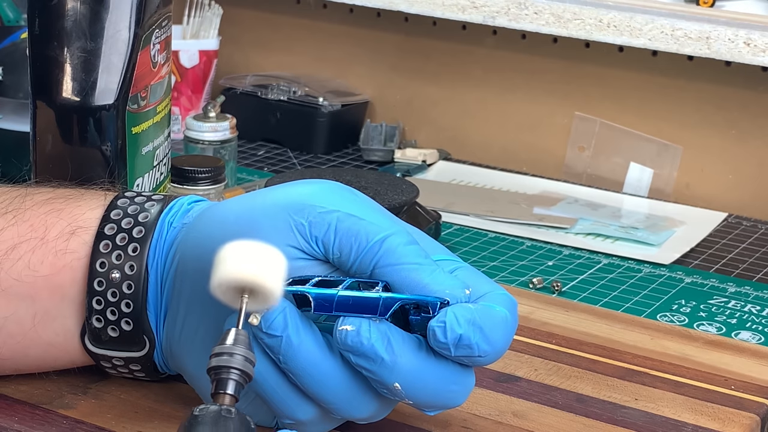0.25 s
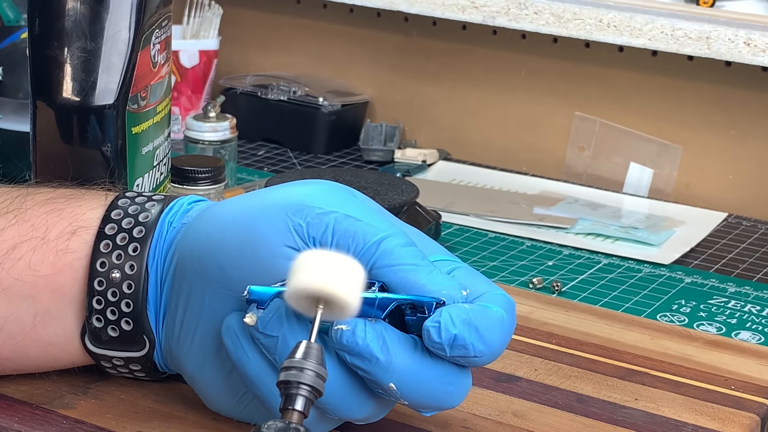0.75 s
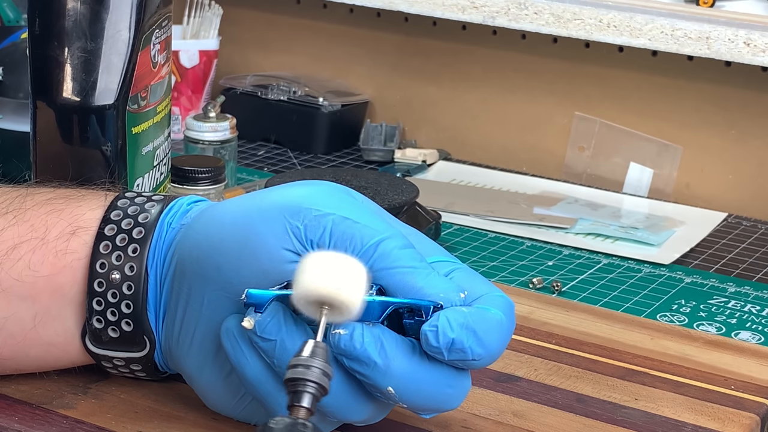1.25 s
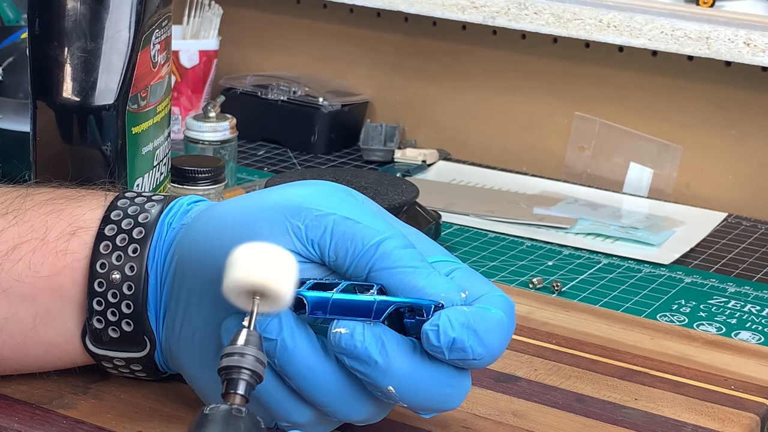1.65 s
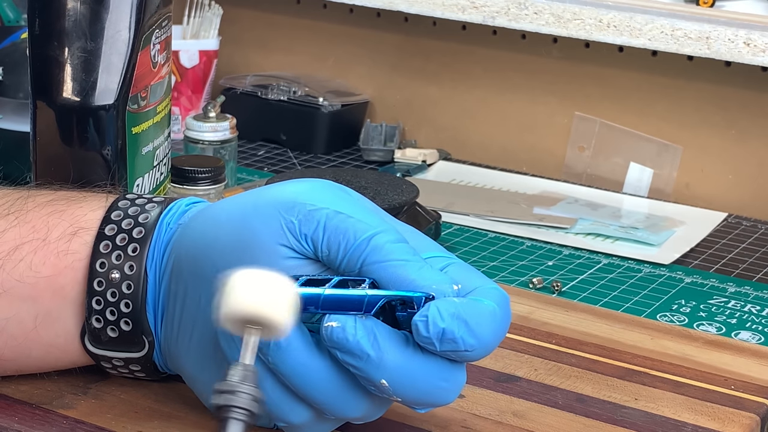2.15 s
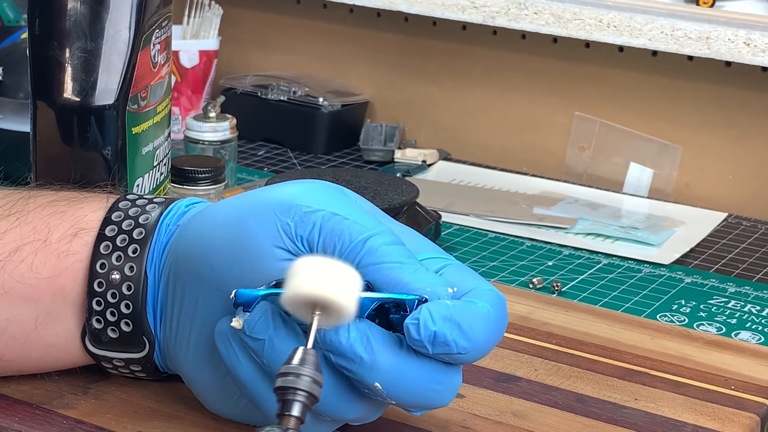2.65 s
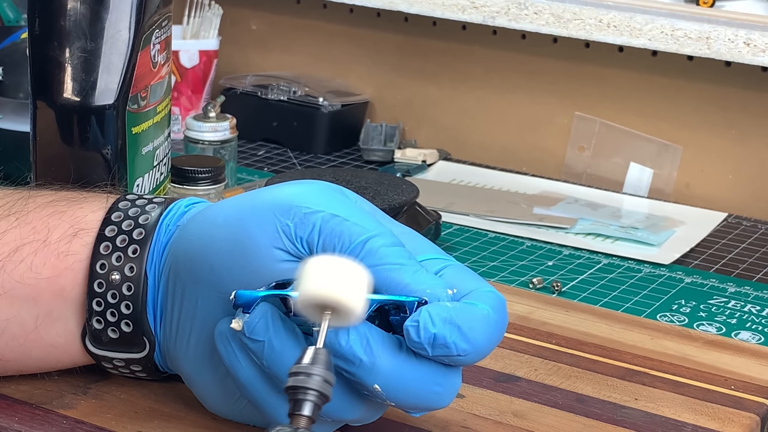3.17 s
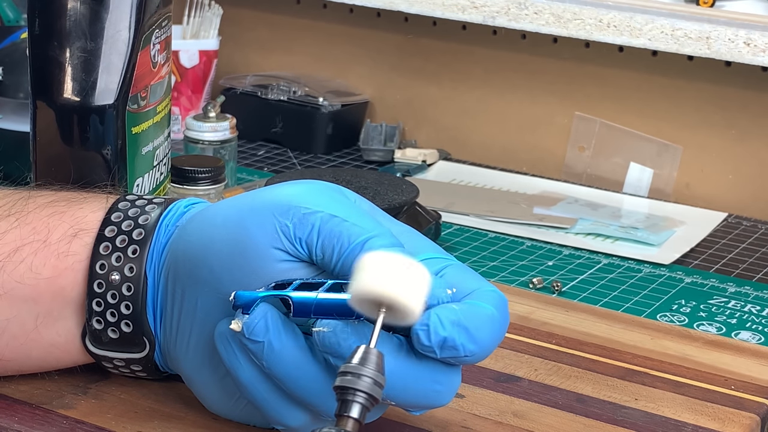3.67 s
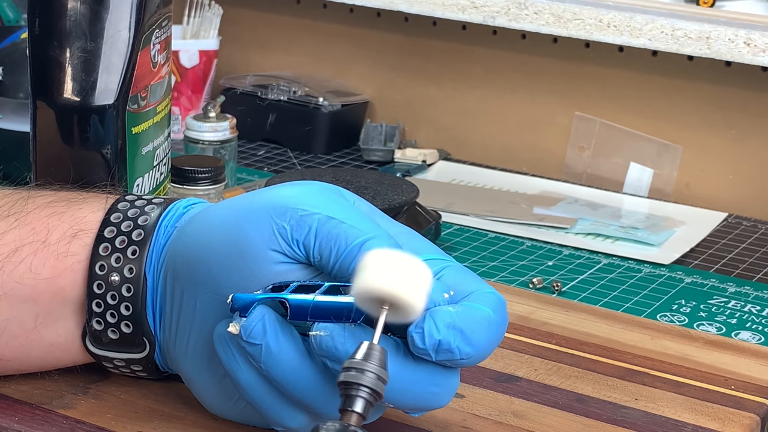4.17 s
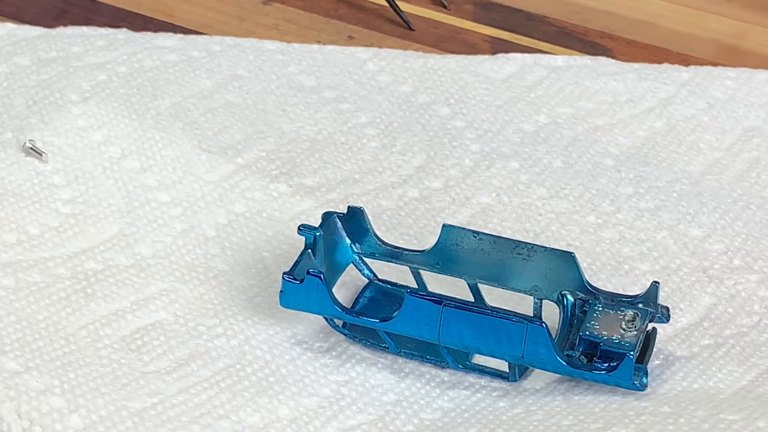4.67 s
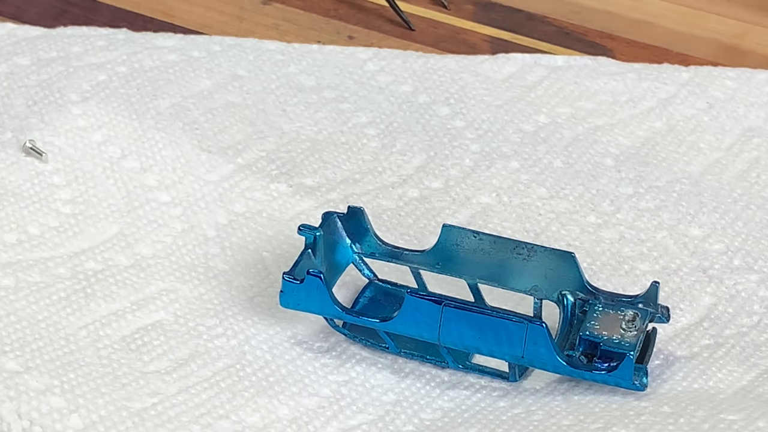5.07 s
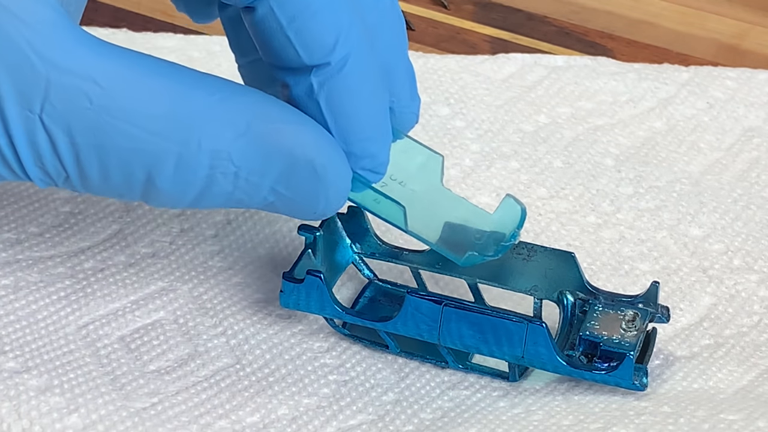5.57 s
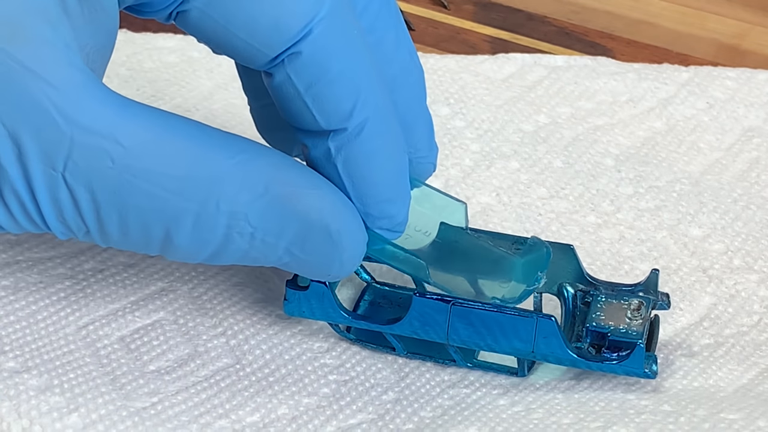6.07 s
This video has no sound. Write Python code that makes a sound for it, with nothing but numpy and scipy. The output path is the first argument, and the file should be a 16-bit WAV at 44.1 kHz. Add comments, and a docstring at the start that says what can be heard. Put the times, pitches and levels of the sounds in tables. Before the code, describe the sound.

Close whirring and chattering of a felt wheel buffing a metal toy car, ending suddenly, followed by quiet handling of small plastic parts.

```python
"""A small rotary tool whirs and rattles close by, spinning a felt wheel against a die-cast toy car body.
The wheel knocks on the metal once a turn; pressing slows the motor, and easing off lets it speed up.
The motor hums, its brushes hiss and its speed controller whines.
The sound cuts off abruptly at an edit, with a soft low thump. Quiet handling follows:
gloved fingers rustle and tap as they fit a plastic window into the body on a paper towel."""
import sys
import numpy as np
from scipy import signal
from scipy.fft import rfft, irfft
from scipy.io import wavfile
from scipy.ndimage import uniform_filter1d, map_coordinates

SR = 44100
rng = np.random.default_rng(int(sys.argv[2]) if len(sys.argv) > 2 else 0)


def generate_wav(signal):
    """Clip the signal to [-1, 1] and save it as 16-bit WAV at the path in sys.argv[1]."""
    frames = np.transpose(np.atleast_2d(signal))
    scaled = np.clip(frames, -1, 1) * 32767
    pcm = np.round(scaled).astype(np.int16)
    wavfile.write(sys.argv[1], SR, pcm)


N = 278579
TIME = np.arange(N) / SR
EDIT_S = 4.696  # an edit cuts from the tool's sound to quiet handling

# The hand trembles, so the wheel bites into the metal, chatters and drags.
# Each row: start in seconds, length in seconds, strength in dB, braking in turns per second.
WHEEL_BITES = [(0.005, 0.064, -60.0, 6.8), (0.097, 0.07, -60.0, 14.2), (0.2, 0.089, -61.0, 8.6),
               (0.349, 0.059, -59.0, 9.0), (0.446, 0.054, -58.5, 11.6), (1.021, 0.073, -57.0, 23.8),
               (1.128, 0.063, -57.5, 22.8), (1.237, 0.068, -60.0, 24.0), (1.356, 0.05, -62.0, 7.4),
               (1.462, 0.07, -62.0, 12.0), (1.585, 0.061, -60.5, 12.7), (1.72, 0.052, -63.0, 22.5),
               (1.83, 0.057, -57.0, 11.9), (1.939, 0.054, -62.0, 5.0), (2.646, 0.061, -64.0, 12.7),
               (2.778, 0.073, -57.5, 26.9), (2.85, 0.096, -59.0, 24.4), (2.989, 0.08, -60.0, 19.6),
               (3.17, 0.06, -58.5, 28.0), (3.348, 0.162, -59.0, 16.8), (3.89, 0.054, -57.0, 21.9),
               (4.022, 0.056, -59.5, 25.0), (4.151, 0.055, -59.0, 21.9), (4.276, 0.055, -57.0, 35.0),
               (4.403, 0.055, -60.5, 0.5)]
# The hands bring the window in and come to rest.
# Each row: time in seconds, dull handling noise in dB, glove rustle in dB.
HAND_LEVELS = [(4.8, -66.5, -79.5), (5.03, -70.5, -74.5), (5.2, -66, -74), (5.55, -68.5, -79.5),
               (5.64, -68, -74.5), (5.71, -72, -81.5), (5.82, -70.5, -78), (5.88, -75.5, -82),
               (6.12, -77, -83.5)]


def gain_of(db):
    """Turns decibels into a number to multiply a sound by."""
    return 10 ** (np.asarray(db) / 20)


def evened(x):
    """Scales a signal so that its average size (rms) is 1."""
    return x / np.sqrt(np.mean(x ** 2) + 1e-20)


def curves(rows):
    """Joins a table's points with straight lines; the first column is the time in seconds."""
    times, *columns = np.transpose(rows)
    return [np.interp(TIME, times, column) for column in columns]


def noise():
    """White noise: an even hiss."""
    return rng.standard_normal(N)


def band(x, lo_hz, hi_hz):
    """Keeps only the frequencies between two limits."""
    hz = np.fft.rfftfreq(N, 1 / SR)
    return irfft(rfft(x) * ((hz >= lo_hz) & (hz <= hi_hz)), N)


def wander(hz):
    """A random drift of average size 1 that heads for a new value hz times a second."""
    points = rng.standard_normal(4000)
    return evened(np.interp(TIME * hz, np.arange(len(points)), points))


def colour(x, points, size=4096):
    """Gives a sound a tone colour, drawn as points of frequency in Hz and level in dB."""
    point_hz, point_db = np.transpose(points)
    hz = abs(np.fft.fftfreq(size, 1 / SR))
    log_gain = np.log(gain_of(np.interp(np.log(hz + 1), np.log(point_hz + 1), point_db)))
    # This makes the filter ring only after a sound, never before it.
    response = np.fft.ifft(np.exp(np.conj(signal.hilbert(log_gain)))).real
    return signal.oaconvolve(x, response[:size // 2])[:N]


def resonate(x, hz, width_hz):
    """Makes a sound ring at one pitch; the narrower the width, the longer it rings."""
    keep = np.exp(-np.pi * width_hz / SR)
    return 2 * signal.lfilter([1 - keep], [1, -keep * np.exp(2j * np.pi * hz / SR)], x).real


def steady(x, lo_hz, hi_hz, size=6000):
    """Turns a sound up and down so that one band of it stays near size 1."""
    part = signal.sosfilt(signal.butter(3, [lo_hz, hi_hz], "band", fs=SR, output="sos"), x)
    power = uniform_filter1d(uniform_filter1d(part ** 2, size), size // 2)
    return x / np.sqrt(abs(power) + 1e-14)


def room(x, echo_db, fade_s):
    """A small workroom adds a short blur of echoes that drops 60 dB in fade_s."""
    t = TIME[:SR // 2]
    tail = rng.standard_normal(len(t)) * gain_of(-60 * t / fade_s) * (t > .004)
    return x + gain_of(echo_db) * signal.oaconvolve(x, tail / np.linalg.norm(tail))[:N]


def contact(start, end, ramp_s=.025):
    """Goes from 0 to 1 as the wheel lands, and back to 0 as it lifts."""
    return np.clip(np.minimum(TIME - start, end - TIME) / ramp_s + .5, 0, 1)


def bites(lead_s=0):
    """How strongly the wheel bites at each moment; every bite begins lead_s early."""
    return np.max([gain_of(db) * contact(start - lead_s, start + length)
                   for start, length, db, _ in WHEEL_BITES], axis=0)


def shaft(start_speed=57.4, free_speed=82.67, firm_sag=21.3, lag_s=.2194, smooth_s=0.21):
    """Presses and bites brake the motor. Gives speed in turns per second and pressure from 0 to 1."""
    # The hand leans the wheel on the metal.
    # Each row: start in seconds, end in seconds, braking in turns per second.
    presses = [(-0.05, 0.56, 14.2), (0.94, 1.21, 16.3), (1.16, 1.42, 27.0), (1.44, 1.64, 19.0),
               (1.61, 1.775, 27.0), (1.8, 2.04, 28.0), (2.6, 2.79, 8.9), (2.73, 3.27, 10.8),
               (3.27, 3.53, 10.4), (3.88, 4.2, 15.0), (4.23, 4.53, 18.0)]
    drag = sum(sag * contact(start, end) for start, end, sag in presses)
    drag += sum(sag * contact(start, start + length) for start, length, _, sag in WHEEL_BITES)
    keep = np.exp(-1 / (lag_s * SR))  # the motor takes a moment to follow
    speed = signal.lfilter([1 - keep], [1, -keep], free_speed - drag, zi=[start_speed])[0]
    # Pressure builds as the motor slows, and goes when the wheel lifts.
    held_sag = np.clip(free_speed - speed, 0, drag)
    return speed, np.tanh(uniform_filter1d(held_sag, int(smooth_s * SR)) / firm_sag)


def level(speed, pressure, db, db_per_speed, pressed_db, working_speed=60):
    """A part's strength: db at working speed with no pressure, shifted by speed and pressure."""
    return gain_of(db + db_per_speed * (speed - working_speed) + pressed_db * pressure)


def hiss(source, turns, spectrum, swell_depth, grain_db):
    """Rubbing noise that swells twice a turn and comes in fine grains."""
    swell = np.exp(swell_depth * (np.cos(2 * np.pi * turns) + np.cos(4 * np.pi * turns)))
    return colour(source * swell * gain_of(grain_db * wander(600)), spectrum)


def strikes(turns, scatter_db):
    """One click of uneven strength at each whole turn."""
    whole_turns = np.floor(np.maximum.accumulate(turns))
    at = np.flatnonzero(np.diff(whole_turns))
    clicks = np.zeros(N)
    clicks[at] = gain_of(scatter_db * rng.standard_normal(2000)[:len(at)])
    return clicks


def felt(turns, speed, pressure, bite_db=-16):
    """The felt wheel hisses as it rubs, louder when it is pressed or bites."""
    # The felt's tone colour. Each row: frequency in Hz, relative level in dB.
    spectrum = [(300, -4.5), (2000, 3), (4200, -5.5), (5500, -7.5), (7500, -3.5), (9300, -3), (10300, -5),
                (12000, -3), (13700, -11), (14400, 0.5), (15800, -34)]
    rub = steady(hiss(noise(), turns, spectrum, swell_depth=0.28, grain_db=4.0), 10300, 12000)
    strength = level(speed, pressure, db=-74.5, db_per_speed=0.072, pressed_db=5.2)
    return np.hypot(strength, gain_of(bite_db) * bites()) * rub


def brushes(turns, speed, pressure, idle_db=-66, bumps=900):
    """The motor's brushes rub the same bumps every turn, spark at random and ring in their springs."""
    # The brushes' tone colour. Each row: frequency in Hz, relative level in dB.
    spectrum = [(300, -48), (1500, 11), (3200, -6.5), (4100, -0.5), (4800, 4.5), (5300, -1), (5800, 3),
                (7500, 2.5), (9500, 1), (10800, -6), (11600, -11), (12600, 2.5), (13800, -7), (15500, -24)]
    # The hiss drifts a little in loudness. Each row: time in seconds, boost in dB.
    boosts = [(0, 2.5), (.9, 1.5), (2.05, 1), (2.2, 1.5), (2.55, 1), (2.8, 1), (3.6, 1), (4.5, 1),
              (4.68, 0.5)]
    surface = map_coordinates(rng.standard_normal(bumps), [turns % 1 * bumps], order=3, mode="grid-wrap")
    sparks = .5 * noise()
    rub = hiss(evened(surface) + sparks, turns, spectrum, swell_depth=0.029, grain_db=1.8)
    springs = 1.3 * resonate(rub, hz=5770, width_hz=80)
    strength = level(speed, pressure, db=-66.5, db_per_speed=0.56, pressed_db=-1.7)
    strength = np.hypot(strength, gain_of(idle_db))  # some hiss stays even at low speed
    return strength * gain_of(curves(boosts)[0]) * steady(rub + springs, 5200, 8000)


def bearings(turns, speed, pressure):
    """The bearings make a gritty noise inside the housing that grows under pressure."""
    # The grit's tone colour. Each row: frequency in Hz, relative level in dB.
    spectrum = [(100, -22.5), (250, -24.5), (420, -19.5), (560, -8), (720, -10), (900, -4.5), (1100, -11.5),
                (1260, -5), (1450, -12), (1650, -4), (1900, 0.2), (2250, -12.5), (2750, -25), (3300, -27),
                (6000, -40.5), (12000, -56)]
    grit = evened(hiss(noise(), turns, spectrum, swell_depth=0.24, grain_db=4.0))
    return level(speed, pressure, db=-60, db_per_speed=0.02, pressed_db=13.5) * grit


def rotor(turns, speed, pressure, waver_db=2.37, flutter_db=2.5, wobble_turns=.0035):
    """The rotor hums at multiples of its speed; each tone flares at pitches where the housing rings."""
    # Where the plastic housing rings. Each row: pitch in Hz, width in Hz, boost in dB.
    housing = [(557, 50, 7), (648, 160, 7.5), (854, 204, 8), (1264.6, 118, 19), (1622, 88, 14),
               (1773, 116, 7.5), (1853, 146, 13), (2164, 160, 9.5), (2740, 60, 6.5)]
    # Tones from the uneven weight, the electrical contacts and the bearings, before the housing's boost.
    # Each row: multiple of the shaft speed, level running free in dB, level pressed in dB.
    tones = [(2, -82.5, -76), (3, -77.5, -69.5), (4, -78.5, -96), (5, -69, -81.5), (6, -76.5, -80.5),
             (7, -65.5, -82), (8, -69.5, -75.5), (9, -65, -76.5), (10, -65, -71.5), (11, -65.5, -69),
             (12, -70.5, -66.5), (13, -69, -73), (14, -67.5, -62.5), (15, -74, -72), (16, -71, -71),
             (17, -75, -69.5), (18, -74.5, -64), (19, -74, -77), (20, -73, -76), (21, -70.5, -72),
             (22, -75, -77), (23, -69.5, -79), (24, -72.5, -70.5), (25, -65.5, -75), (26, -70.5, -80.5),
             (27, -92, -72), (28, -67, -88), (29, -77, -72.5), (30, -78, -73), (31, -76.5, -69.5),
             (32, -80, -82), (33, -84, -75), (34, -73.5, -83), (35, -77, -79), (36, -74.5, -89),
             (37, -85, -93), (38, -78.5, -88), (39, -107, -96), (40, -83, -71), (41, -81, -91),
             (42, -75, -80)]
    grid_hz = np.arange(0, 4000., 4)
    housing_db = sum(boost / (1 + (2 * (grid_hz - hz) / width) ** 2) for hz, width, boost in housing)
    angle = turns + wobble_turns * pressure * wander(40)
    out = np.zeros(N)
    for multiple, free_db, pressed_db in tones:
        db = free_db + (pressed_db - free_db) * pressure
        db += np.interp(multiple * speed, grid_hz, housing_db)
        db += waver_db * wander(14) + flutter_db * pressure * (wander(38) - .5)
        cycles = multiple * angle + 0.23 * rng.standard_normal()
        out += gain_of(db) * np.cos(2 * np.pi * cycles)
    return np.sqrt(2) * out


def knocks(turns, pressure, scrape_s=.0013, cushion=22, graze_db=-66):
    """The wheel's high spot strikes the metal once a turn and scrapes on for a moment."""
    # The struck car body's tone colour. Each row: frequency in Hz, relative level in dB.
    spectrum = [(150, -28), (400, -18), (700, -11.5), (1100, -9.5), (1370, -8.5), (1600, -0.5), (1900, 1.5),
                (2200, -8), (2750, -7), (3100, -18), (3700, -15), (4100, -6.5), (4550, -5.5), (5000, -23.5),
                (5500, -29), (5750, -10), (6600, -31), (7800, -30), (9500, -9.5), (11500, -29),
                (13800, -21), (15500, -31)]
    blows = strikes(turns + .47 + .006 * wander(60), scatter_db=.6)
    touch = signal.lfilter([1], [1, -np.exp(-1 / (scrape_s * SR))], blows)
    scrape = 0.066 * touch * noise()
    chatter = steady(colour(blows + scrape, spectrum), 3950, 4750, size=16000)
    chatter = cushion * np.tanh(chatter / cushion)  # the soft felt cushions the hardest blows
    # The wheel chatters just before each bite drags, and grazes faintly between bites.
    return np.hypot(bites(lead_s=0.0068), gain_of(graze_db) * pressure) * chatter


def slaps(turns, drag_s=.00013, lead_s=0.0004, snap_s=.0001, low_cut_hz=650):
    """Once a turn the felt drags the metal along and lets it snap back: a short dry tick."""
    # Spells when the felt catches. Each row: start in seconds, length in seconds, strength in dB.
    spells = [(0, 0.16, -42), (0.198, 0.092, -42), (0.388, 0.096, -35), (0.94, 0.12, -31),
              (1.027, 0.24, -35), (1.427, 0.063, -37), (1.825, 0.04, -33), (1.934, 0.041, -42),
              (2.757, 0.068, -34), (2.927, 0.045, -39), (3.153, 0.11, -32.5), (3.39, 0.049, -43),
              (3.897, 0.21, -29.5), (4.15, .035, -30), (4.27, 0.06, -47), (4.397, 0.03, -41)]
    t = np.arange(-66, 66) / SR
    drag = np.exp(-.5 * ((t + lead_s) / drag_s) ** 2)
    snap = np.exp(-abs(t) / snap_s)
    tick = snap - drag * snap.sum() / drag.sum()  # the pull and the snap balance out
    strength = np.max([gain_of(db) * contact(s, s + length) for s, length, db in spells], axis=0)
    snaps = strength * strikes(turns + .45 + .008 * wander(60), scatter_db=1.5)
    low_cut = signal.butter(2, low_cut_hz, "high", fs=SR, output="sos")
    return signal.sosfilt(low_cut, np.convolve(snaps, tick, "same"))


def hum(hz=52.8, db=-53):
    """A low, almost steady hum lies under the tool's sound."""
    return np.sqrt(2) * gain_of(db + 0.068 * wander(12)) * np.sin(2 * np.pi * hz * TIME)


def rings(pressure):
    """Rubbing keeps the car body and the housing ringing at pitches that stay put."""
    # Each row: pitch in Hz, rough width in Hz, level at full pressure in dB.
    pitches = [(852, 20, -59), (1258, 22, -54), (1615, 22, -62.5), (1862, 26, -62.5), (2590, 50, -68),
               (2735, 40, -69)]
    return pressure * sum(gain_of(db) * evened(resonate(resonate(noise(), hz, 2 * width), hz, 2 * width))
                          for hz, width, db in pitches)


def whine(turns, chop_hz=4567.2, waver_db=2.0):
    """The speed controller chops the current and whines; side tones spread as the shaft speeds up."""
    # Each entry: how far a tone lies from a multiple of the chop rate, in multiples of the shaft speed.
    offsets = [-12, -6, -3, 0, 3, 6]
    # One row for each multiple of the chop rate. Each row: a level in dB for each of the offsets.
    levels = [(-92, -89, -91, -74, -79, -102), (-70, -72.5, -63.5, -64.5, -66.5, -75.5),
              (-79, -92, -74, -75, -81, -90)]
    out = np.zeros(N)
    for multiple, row in enumerate(levels, 1):
        for offset, db in zip(offsets, row):
            strength = np.sqrt(2) * gain_of(db + waver_db * wander(6.3))
            cycles = multiple * chop_hz * TIME + offset * turns + rng.random() + 0.05 * wander(25)
            out += strength * np.cos(2 * np.pi * cycles)
    return out


def tool(motor_waver_db=0.68, felt_waver_db=2.5, cut_s=0.00049):
    """The whole tool: one shaft drives its moving parts. Its sound cuts off at the edit."""
    speed, pressure = shaft()
    turns = np.cumsum(speed) / SR
    felt_hiss = felt(turns, speed, pressure)
    brush_hiss = brushes(turns, speed, pressure)
    motor = bearings(turns, speed, pressure) + rotor(turns, speed, pressure)
    motor *= gain_of(motor_waver_db * wander(22.015))
    felt_hiss *= gain_of(felt_waver_db * wander(25.05))
    rubbing = brush_hiss + felt_hiss + knocks(turns, pressure) + slaps(turns)
    tones = motor + hum() + rings(pressure) + whine(turns)
    before_edit = np.clip((EDIT_S - TIME) / cut_s, 0, 1)
    return (tones + room(rubbing, echo_db=-9.5, fade_s=0.089)) * before_edit


def air(waft_s=4.935, waft_half_s=0.073, waft_db=-24):
    """Air rumbles at the microphone: steady by the tool, then stirred by the hands, with one waft."""
    # The rumble's tone colour. Each row: frequency in Hz, relative level in dB.
    spectrum = [(15, -4), (30, 1), (55, -6), (80, -8.5), (120, -24.5), (200, -32.5), (400, -33),
                (1000, -85)]
    handling_db = curves(HAND_LEVELS)[0]
    rumble_db = np.where(TIME < EDIT_S, -61, handling_db + 15.5)
    draught_db = np.where(TIME < EDIT_S, -49, handling_db + 30.5)
    rumble = band(colour(noise(), spectrum), 18, 2000)
    rumble /= band(rumble, 25, 110).std()
    draught = evened(band(noise(), 2, 13))
    waft = gain_of(waft_db) * np.exp(-((TIME - waft_s) / waft_half_s) ** 4)
    return gain_of(rumble_db) * rumble + gain_of(draught_db) * draught + waft


def edit_thump(db=-35, decay_s=0.012, rise_s=0.00055):
    """A soft low thump where the sound cuts off at the edit."""
    age = np.maximum(TIME - EDIT_S + 0.00234, 0)
    return gain_of(db) * np.exp(-age / decay_s) * (1 - np.exp(-age / rise_s))


def gloves():
    """After the edit, gloved hands move the parts with a dull noise and a bright rustle."""
    # The tone colours of the two noises. Each row: frequency in Hz, relative level in dB.
    dull_spectrum = [(71, -35), (120, -8), (192, -18), (256, -12.5), (416, -18), (617, -16.5), (888, -29),
                     (988, -29.5), (2240, -34.5), (4500, -47.5), (5850, -86), (9900, -120)]
    rustle_spectrum = [(1470, -15), (2500, -9), (2830, -11.5), (3730, -9), (4220, -8.5), (4780, -9),
                       (5930, -5), (15000, -10), (15800, -21)]
    dull_db, rustle_db = curves(HAND_LEVELS)
    dull = steady(colour(noise(), dull_spectrum), 200, 900)
    grains = noise() * gain_of(0.73 * wander(450))
    rustle = steady(colour(grains, rustle_spectrum), 5000, 14000)
    return (gain_of(dull_db) * dull + gain_of(rustle_db) * rustle) * (TIME > EDIT_S)


def taps():
    """Plastic and metal touch: each tap is a short burst of noise ringing around one pitch."""
    # Each row: start in seconds, level in dB, pitch in Hz, width in Hz, seconds to fade by 60 dB.
    touches = [(4.906, -68, 4270, 300, .05), (5.075, -53.5, 9150, 900, 0.01),
               (5.075, -62, 5400, 600, 0.013), (5.1911, -47.5, 1230, 900, 0.027),
               (5.1905, -60, 2680, 700, 0.013), (5.198, -64, 1380, 1400, 0.14), (5.5, -64, 640, 500, 0.022),
               (5.74, -58, 6000, 5000, 0.016), (5.744, -60, 4970, 5040, 0.019),
               (5.754, -58, 8000, 6000, 0.0091), (5.762, -66, 8000, 6000, 0.014),
               (6.048, -78, 2600, 900, .03)]
    out = np.zeros(N)
    for start, db, hz, width, fade_s in touches:
        part = out[round(start * SR):][:SR // 4]
        burst = rng.standard_normal(len(part))
        ring = evened(resonate(resonate(burst, hz, width), hz, width))
        part += ring * gain_of(db - 60 * TIME[:len(part)] / fade_s)
    return room(out, echo_db=-11, fade_s=0.17)


def judder():
    """A gloved finger judders over the table, making a low, wavering tone."""
    # Each row: time in seconds, pitch in Hz, level in dB.
    path = [(5.55, 66.5, -55), (5.59, 85, -41), (5.64, 143, -53), (5.68, 83, -38.5), (5.72, 63, -45),
            (5.79, 53, -54), (5.84, 55.1, -34.5), (5.87, 48.7, -83)]
    hz, db = curves(path)
    moving = (TIME > path[0][0]) & (TIME < path[-1][0])
    return gain_of(db) * np.sin(2 * np.pi * np.cumsum(hz) / SR) * moving


def slide(start_s=6.16, peak_db=-64, rise_s=0.044, fade_db_per_s=97):
    """The car body is nudged along the paper towel with a brief, soft scrape."""
    # The scrape's tone colour. Each row: frequency in Hz, relative level in dB.
    spectrum = [(120, -61), (200, -30), (287, 2), (340, -12), (371, -4), (774, -10), (888, -8), (1020, -10),
                (1620, -13.5), (12000, -31.5), (15600, -69), (22000, -120)]
    age = np.maximum(TIME - start_s, 0)
    rise = np.minimum(age / rise_s, 1)
    fade = gain_of(peak_db - fade_db_per_s * np.maximum(age - rise_s, 0))
    grains = noise() * gain_of(0.79 * wander(250))
    return rise * fade * evened(colour(grains, spectrum))


def scene():
    """All the sounds, added into one channel."""
    return (tool() + air() + edit_thump() + gloves() + slide() + judder() + taps())[None]


def record(dry):
    """Removes the very highest treble, above 15800 Hz."""
    treble_cut = signal.firwin(511, 15800, window=("kaiser", 9), fs=SR)
    return signal.oaconvolve(dry, treble_cut[None], "same")


dry = scene()
out = record(dry)
generate_wav(out)
```